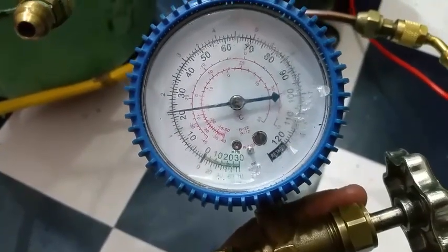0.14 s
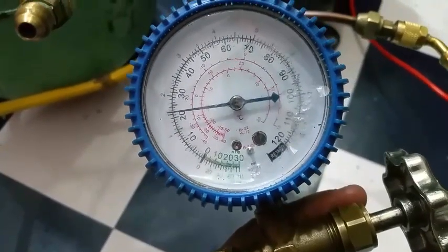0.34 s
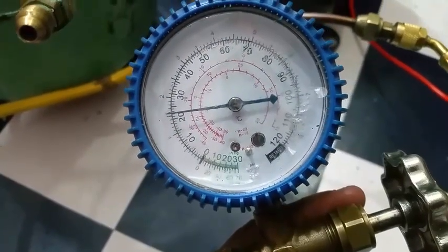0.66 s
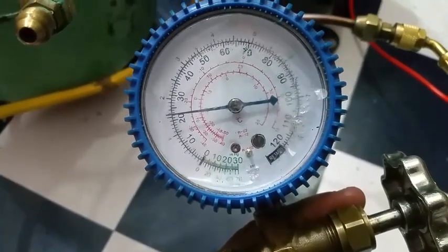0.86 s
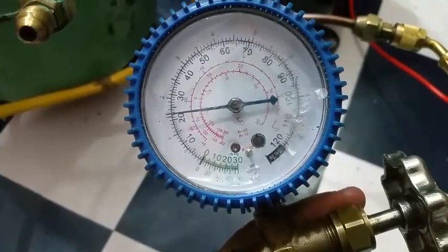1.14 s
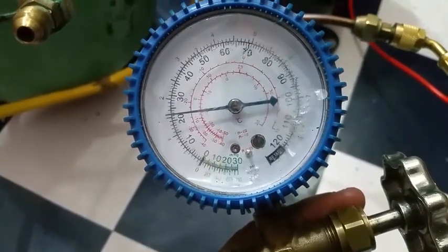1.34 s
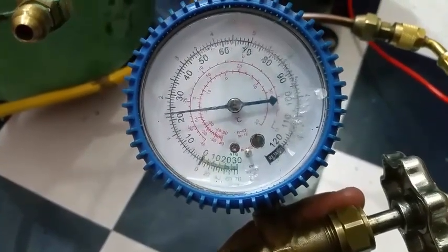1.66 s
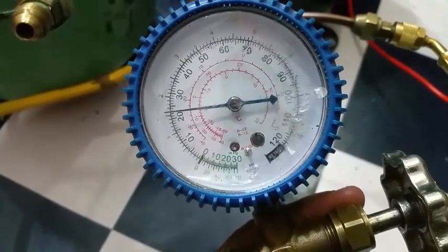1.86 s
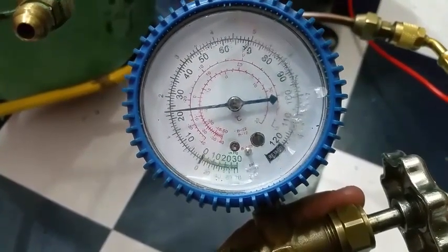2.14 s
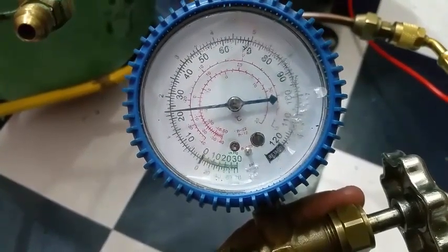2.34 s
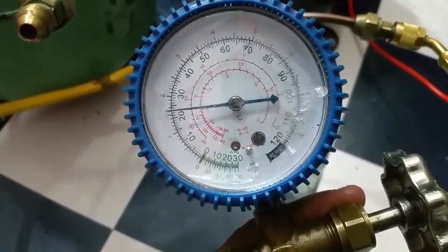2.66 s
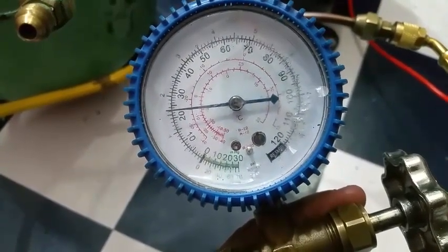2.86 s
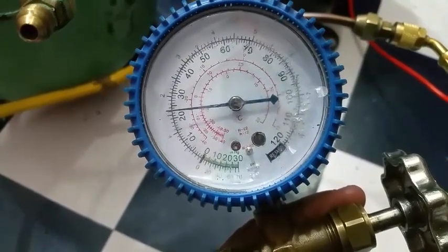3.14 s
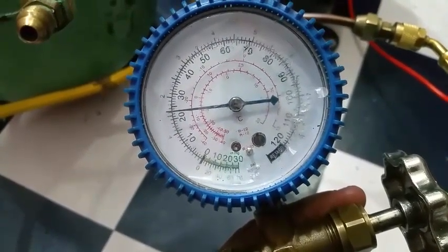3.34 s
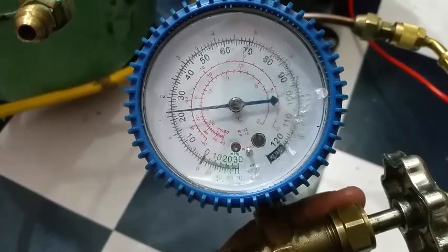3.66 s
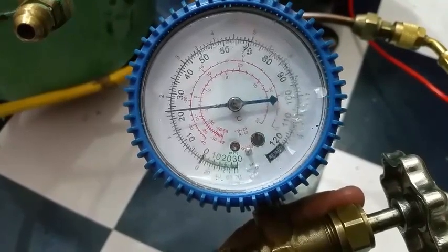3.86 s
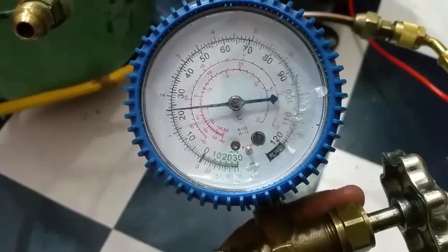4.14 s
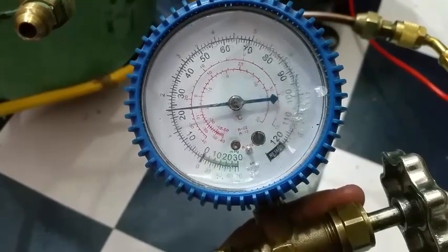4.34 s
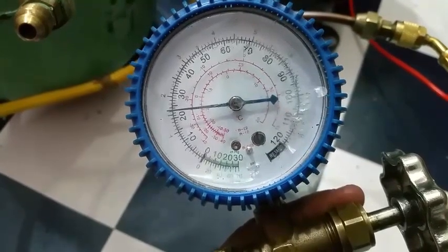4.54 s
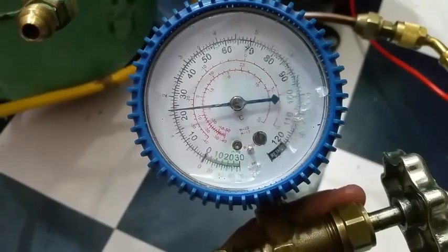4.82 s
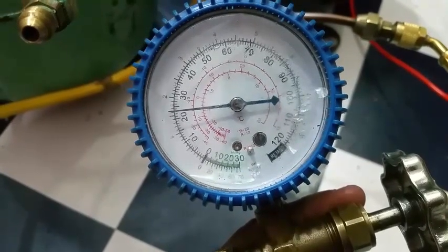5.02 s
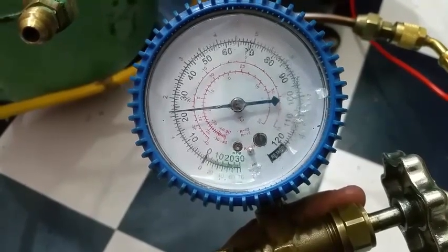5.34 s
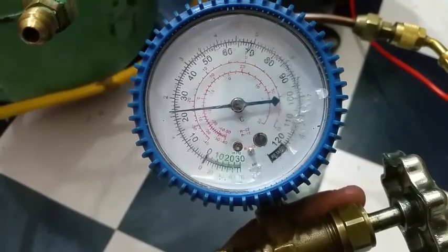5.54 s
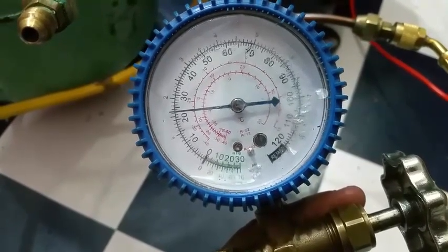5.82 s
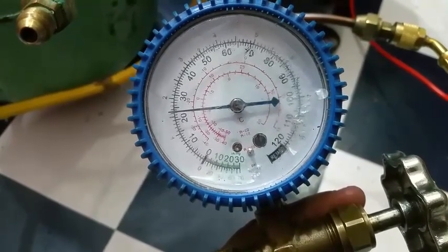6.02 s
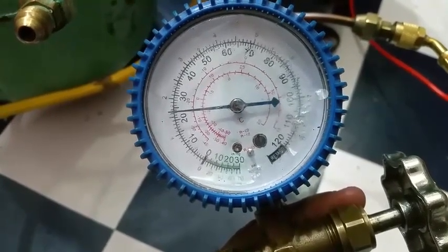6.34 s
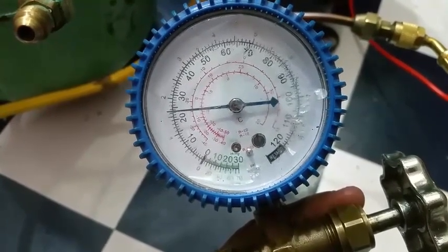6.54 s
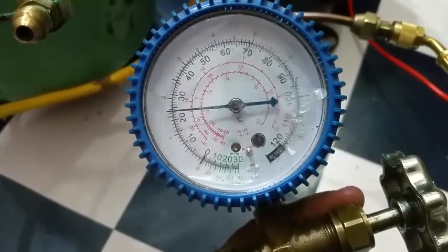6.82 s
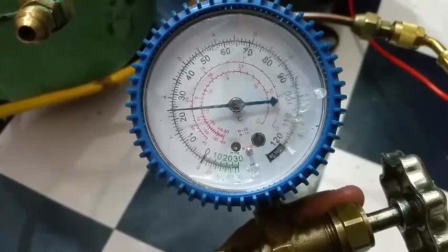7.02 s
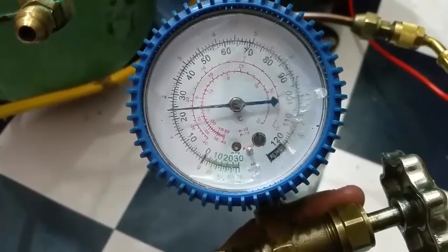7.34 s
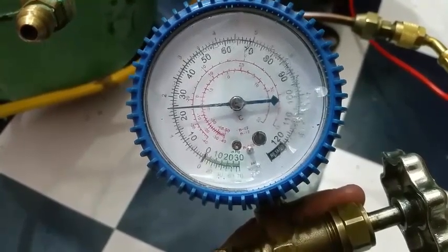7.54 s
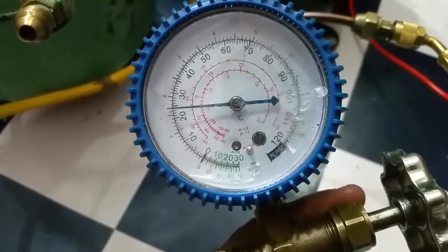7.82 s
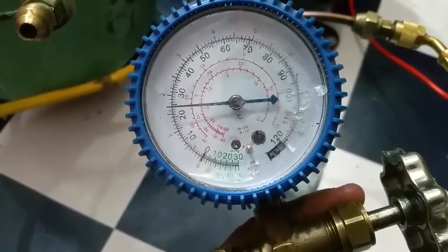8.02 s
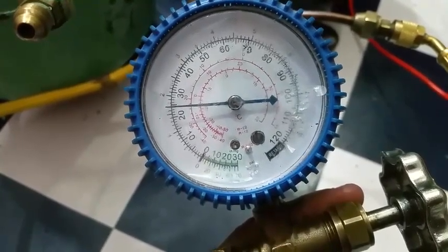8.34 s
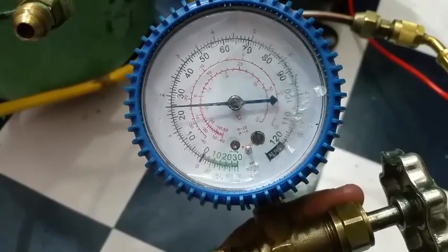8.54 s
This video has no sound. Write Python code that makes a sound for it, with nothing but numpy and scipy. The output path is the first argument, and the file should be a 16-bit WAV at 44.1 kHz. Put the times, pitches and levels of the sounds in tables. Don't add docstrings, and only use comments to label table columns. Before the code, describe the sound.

From 0 to about 8.7 seconds a small sealed compressor runs continuously in a tiled workshop, already going at the start and still going at the end. The foreground is a bright, dense hiss of gas through valves, strongest around 2 to 6 kilohertz, with metallic colouring from the steel shell, pipes and tank. It puffs shallowly about fifty times a second, so it sounds like a fine flutter rather than separate beats. Well below it lie a steady shaft and mains hum, a more distant fan and motor drone swelling softly about once a second, near 0.5, 1.5 and 2.5 seconds onward, and a low airy rumble. A faint, wavering whine leans right. The hiss weakens by less than one decibel overall. Close phone stereo, wide and slightly grainy, with the highest treble cut off.

```python
import sys
import numpy as np
from scipy import signal
from scipy.fft import dct
from scipy.io import wavfile
from scipy.ndimage import uniform_filter1d

SR = 44100
rng = np.random.default_rng(int(sys.argv[2]) if len(sys.argv) > 2 else 0)


def generate_wav(sig):
    pcm = np.round(np.clip(np.atleast_2d(sig).T, -1, 1) * 32767).astype(np.int16)
    wavfile.write(sys.argv[1], SR, pcm)


def convert_level_to_amplitude(level_db):
    exponent = np.asarray(level_db, float) / 20
    return 10 ** exponent


N = 382788
TIME_S = np.arange(N) / SR


def evened(x):
    return x / np.sqrt(np.mean(x ** 2) + 1e-20)


def read(points, hz):
    point_hz, value = np.transpose(points)
    return np.interp(np.log(hz + 1), np.log(point_hz + 1), value)


def wander(top_hz):
    coarse_s = np.arange(0, N + 200, 200) / SR
    hz = np.geomspace(top_hz / 30, top_hz, num=30)[:, None]
    sines = np.sin(2 * np.pi * (hz * coarse_s + rng.random(hz.shape)))
    slow = (sines / np.sqrt(hz)).sum(0)
    return np.interp(TIME_S, coarse_s, evened(slow))


def air(left, right, link, patchy_db):
    a, b, c, d, patch = rng.standard_normal((N // 512 + 5, 1025, 5)).T
    patch = uniform_filter1d(patch, size=24, axis=0)
    patch = evened(uniform_filter1d(patch, size=6, axis=1))
    link = (link / np.maximum(abs(link), 1))[:, None]
    shared, private = a + 1j * b, c + 1j * d
    at_right = link * shared + np.sqrt(abs(1 - abs(link) ** 2)) * private
    z = np.array([shared, at_right])
    z *= np.sqrt([left, right])[:, :, None] * convert_level_to_amplitude(patchy_db * patch)
    return evened(signal.istft(z, nperseg=2048, noverlap=1536)[1][:, :N])


# pitch_hz [Hz], level_db [dB per Hz]
RUMBLE_SPECTRUM = [(12, -6), (30, -7.5), (55, -7), (100, -1), (170, 2), (240, -2), (330, -4.5), (420, -0.5),
                   (560, -1.5), (720, -1.5), (850, -5.5), (1400, -7.5), (2000, -21), (3000, -45.5)]
# pitch_hz [Hz], likeness [0-1]
RUMBLE_LIKENESS = [(30, .97), (220, .9), (320, .74), (420, .88), (550, .48), (720, .48), (900, .05),
                   (2000, .05)]
RUMBLE_DB = -49.5


def rumble():
    hz = np.fft.rfftfreq(2048, 1 / SR)
    power = convert_level_to_amplitude(2 * read(RUMBLE_SPECTRUM, hz))
    likeness = np.clip(read(RUMBLE_LIKENESS, hz), 0, 1) + 0j
    return air(power, power, likeness, patchy_db=1.0) * convert_level_to_amplitude(RUMBLE_DB + .5 * wander(8.))


def tone(hz, db, drift_rad, waver_db, start_s=None):
    if start_s is None:
        start_s = rng.random() / hz
    phase = 2 * np.pi * hz * (TIME_S - start_s) + drift_rad * wander(4.)
    return np.sqrt(2) * convert_level_to_amplitude(db + waver_db * wander(4.6)) * np.sin(phase)


SHAFT_HZ, MAINS_HZ, FAN_HZ, MOTOR_HZ, BLADE_HZ = 49.6, 50.165, 21.066, 48.11, 148.44
BLADE_DB, SEVENTH_DB, WINDING_DB = -56, -65.5, -56
IN_STEP_S = .55
# order [multiple of SHAFT_HZ], level_db [dB]
SHAFT_ORDERS = [(2, -69.5), (12, -67), (14, -64), (15, -71), (31, -74)]
# order [multiple of MAINS_HZ], level_db [dB]
MAINS_ORDERS = [(2, -70), (6, -66), (8, -74), (10, -74)]
# order [multiple of FAN_HZ], level_db [dB]
FAN_ORDERS = [(2, -72), (3, -73), (5, -67), (6, -72), (8, -65), (9, -71), (10, -69), (12, -70), (18, -70)]
# order [multiple of MOTOR_HZ], level_db [dB]
MOTOR_ORDERS = [(2, -67), (4, -70), (10, -70), (12, -71), (16, -71)]
# pitch_hz [Hz], level_db [dB]
STRAY_TONES = [(86.55, -73), (179.6, -72), (280, -75), (443.4, -71), (522.6, -72), (1593.8, -71)]


def hum():
    out = tone(BLADE_HZ, BLADE_DB, drift_rad=0.04, waver_db=0.3, start_s=IN_STEP_S)
    out += tone(7 * FAN_HZ, SEVENTH_DB, drift_rad=0.04, waver_db=0.3, start_s=IN_STEP_S)
    out += tone(4 * MAINS_HZ, WINDING_DB, drift_rad=0.06, waver_db=0.4)
    families = ((SHAFT_HZ, SHAFT_ORDERS), (MAINS_HZ, MAINS_ORDERS), (FAN_HZ, FAN_ORDERS),
                (MOTOR_HZ, MOTOR_ORDERS), (1, STRAY_TONES))
    for base_hz, orders in families:
        for order, db in orders:
            out += tone(order * base_hz, db, drift_rad=0.12, waver_db=0.78)
    return out


# pitch_hz [Hz], left_db [dB], right_db [dB]
SLOT_WHINE = [(1657.5, -70, -61)]


def whine():
    out = np.zeros((2, N))
    for hz, left_db, right_db in SLOT_WHINE:
        port_gain = convert_level_to_amplitude([[left_db], [right_db]]) * [[-1], [1]]
        out += tone(hz, 0, drift_rad=2.9, waver_db=5.5) * port_gain
    return out


# pitch_hz [Hz], width_hz [Hz],
# left_db [dB], right_db [dB], lead_rad [radians the right leads beyond the port delay], likeness [0-1]
HISS_MODES = [(1114, 180, -5, -10, 1.7, 0.51), (1596, 161.0, -5, -1.33, 1.5, 0.64),
              (1889, 60.0, -10.0, -9.0, 1.9, 0.4), (2072, 120, -5.5, -5.5, 2.16, 0.9),
              (2237, 249.0, -28.5, -4.1, 1, 0.99), (2523, 257.0, -7, 4, -5.5, 1),
              (2586, 337.0, -3, -2.5, -0.54, 0.96), (2915.0, 287.0, -4, -3, 0.65, 1.0),
              (3070, 171.0, -6.5, 1.4, -0.64, 0.5), (3450, 261.0, -8.5, -5, -0.2, 0.61),
              (3682, 259.0, -4.0, -5.5, 2.54, 1.0), (3866, 149.0, -6.5, -4.5, 1.11, 1),
              (4196, 379.0, -0.83, -0.56, 1.32, 0.81), (4782, 373.0, -6.0, -6.0, 1.69, 0.97),
              (5120, 456.0, -10.5, -8.5, 2.42, 1.0), (5344, 273.0, -2, -0.7, 1.37, 0.79),
              (5566, 495.0, -11.5, -10, 1.5, 0.51), (5895, 140, -8, -6.5, 1.35, 0.81),
              (5720, 200.0, -15.5, -15.0, 0.5, 0.24), (6000, 86.0, -11.5, -10.5, 1.29, 0.78),
              (6286, 404.0, -5.5, -9, 1.69, 0.66),
              (6796, 442.0, -6.5, -10.1, 0.72, 0.8), (7290, 210, -9.5, -15, -0.45, 0.63),
              (7640, 900.0, -14.5, -18.5, -1.41, 0.79), (7875, 370.0, -7.5, -14.5, 0.13, 0.56),
              (8170, 250.0, -17.0, -20.5, 0.28, 0.4), (8600.0, 200.0, -18.5, -21, -1.6, 1),
              (8447, 150, -12.5, -16, 1.01, 0.75), (9084, 592.0, -13.5, -13, -1.28, 0.99),
              (9100, 330, -21, -19.5, 1.44, 0.99), (9614.0, 335.0, -10.5, -12, 0.48, 0.7),
              (10036.0, 490, -16.5, -15.5, -1.04, 0.6), (10520, 513, -14, -14.5, -0.44, 0.84)]
PORT_DELAY_S = 16.5 / SR
HISS_DB, SAG_DB_PER_S = -37, -0.08


def hiss():
    hz = np.fft.rfftfreq(2048, 1 / SR)
    modes = HISS_MODES
    mode_hz, width_hz, left_db, right_db, lead_rad, likeness = np.transpose(modes)
    shape = (1 + (2 * (hz[:, None] - mode_hz) / width_hz) ** 2) ** -2.
    left, right = shape @ convert_level_to_amplitude(2 * left_db), shape @ convert_level_to_amplitude(2 * right_db)
    shared = shape @ (convert_level_to_amplitude(left_db + right_db) * np.clip(likeness, 0, 1) * np.exp(1j * lead_rad))
    link = shared * np.exp(-2j * np.pi * hz * PORT_DELAY_S) / np.sqrt(left * right)
    turn = 2 * np.pi * SHAFT_HZ * TIME_S
    puff = 1 + .08 * np.cos(turn - 1.5 + .3 * wander(3.)) + .02 * np.cos(2 * turn + 1.8)
    flutter_db = 0.43 * wander(40.)
    level_db = HISS_DB + SAG_DB_PER_S * TIME_S + flutter_db
    return air(left, right, link, patchy_db=0.79) * puff * convert_level_to_amplitude(level_db)


def scene():
    return rumble() + hum() + whine() + hiss()


TOP_BIN, HOP = 504, 1024


def fold(frames):
    a, b, c, d = np.split(frames, 4, axis=-1)
    return dct(np.concatenate([-c[..., ::-1] - d, a - b[..., ::-1]], axis=-1), 4, norm="ortho")


def unfold(spectra):
    u, v = np.split(dct(spectra, 4, n=HOP, norm="ortho"), 2, axis=-1)
    return np.concatenate([v, -v[..., ::-1], -u[..., ::-1], -u], axis=-1)


def joint_rounding(x, grid, window, steps, lean, whim):
    lead, group = 2 * HOP - grid, 12
    at = HOP * np.arange(N // HOP + 3)[:, None] + np.arange(2 * HOP)
    padded = np.pad(x, ((0, 0), (lead, 4 * HOP)))
    ports = fold(padded[:, at] * window)[..., :TOP_BIN]
    pair = np.array([ports[0] + ports[1], ports[0] - ports[1]]) / 2

    def power_product(z):
        return (z ** 2).reshape(2, len(at), -1, group).sum(-1).prod(0)

    ports_power, pair_power = power_product(ports), power_product(pair)
    apart = (ports_power < lean * pair_power) | (rng.random(pair_power.shape) < whim)
    apart = np.repeat(apart, group, axis=-1)
    hz = (np.arange(TOP_BIN) + .5) * SR / (2 * HOP)
    uneven_db = 1.4 * np.repeat(rng.standard_normal(pair_power.shape), group, axis=-1)
    step = convert_level_to_amplitude(read(steps, hz) + uneven_db)
    spectra = np.where(apart, ports, pair)
    kept = np.sign(spectra) * np.floor(abs(spectra / step) ** .75 + .4054) ** (4 / 3) * step
    kept = np.where(apart, kept, [kept[0] + kept[1], kept[0] - kept[1]])
    frames = unfold(kept) * window
    lapped = frames[:, :-1, HOP:] + frames[:, 1:, :HOP]
    return lapped.reshape(2, -1)[:, lead - HOP:][:, :N]


def roll_off(x):
    return signal.sosfilt(signal.butter(12, 11630, fs=SR, output="sos"), x)


# pitch_hz [Hz], step_db [dB]
COARSE_STEPS = [(40, -32), (1400, -33), (2300, -31), (2600, -28.5), (4400, -28.5), (6000, -31),
                (7000, -33.5), (10800, -36.5)]
# pitch_hz [Hz], step_db [dB]
FINE_STEPS = [(20, -53), (700, -52), (1400, -46.5), (2300, -48.5), (2700, -42), (3300, -44), (5900, -44),
              (7500, -50)]


def record(dry):
    sine = np.sin(np.pi * (np.arange(2 * HOP) + .5) / (2 * HOP))
    steep = signal.windows.kaiser_bessel_derived(2 * HOP, 4 * np.pi)
    once = joint_rounding(dry - .0008, 358, sine, COARSE_STEPS, lean=2.2, whim=.025)
    twice = joint_rounding(once, 806, steep, FINE_STEPS, lean=0, whim=0)
    return roll_off(twice)


dry = scene()
out = record(dry)
generate_wav(out)
```